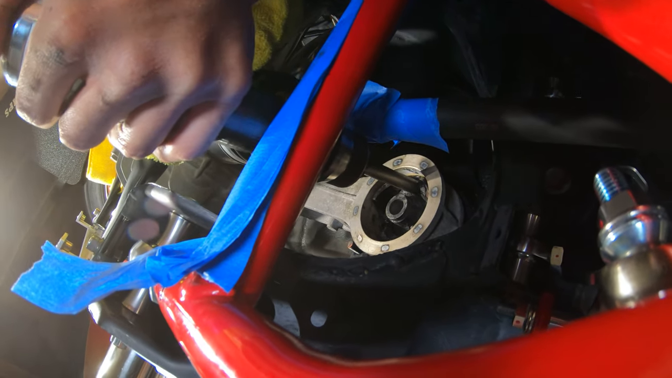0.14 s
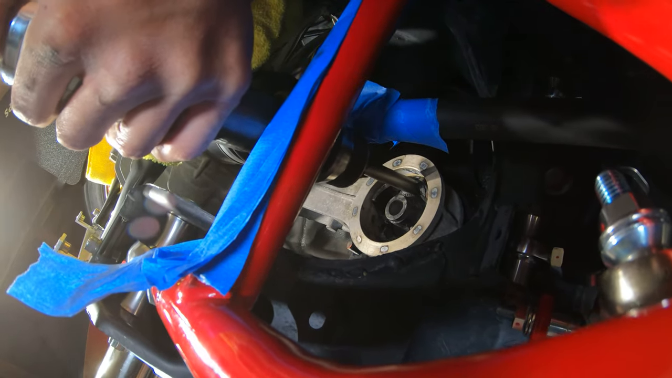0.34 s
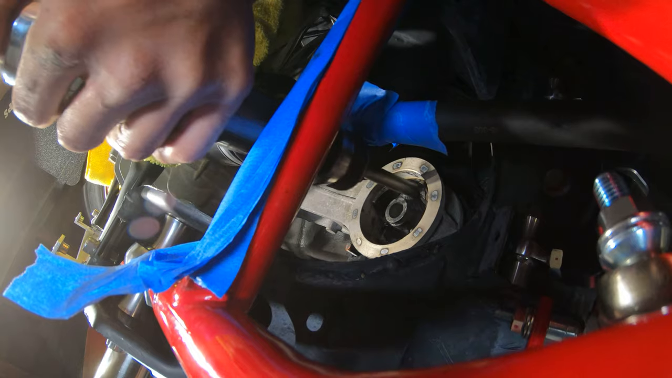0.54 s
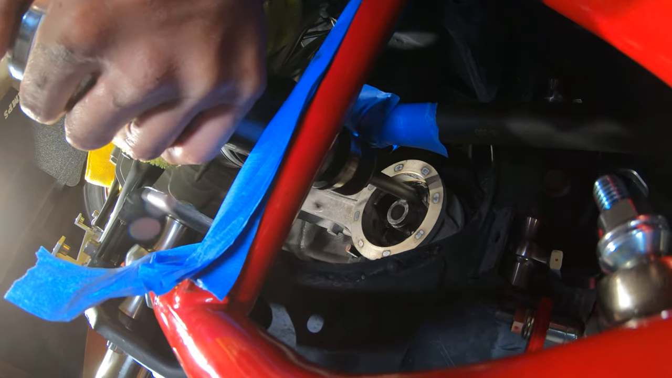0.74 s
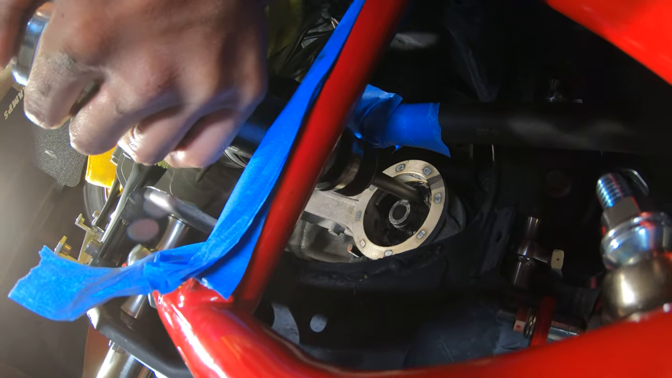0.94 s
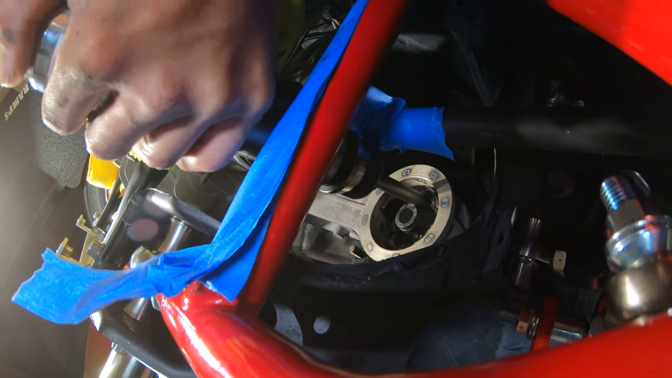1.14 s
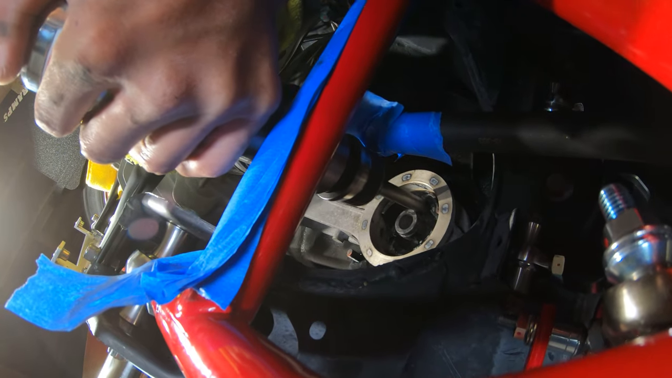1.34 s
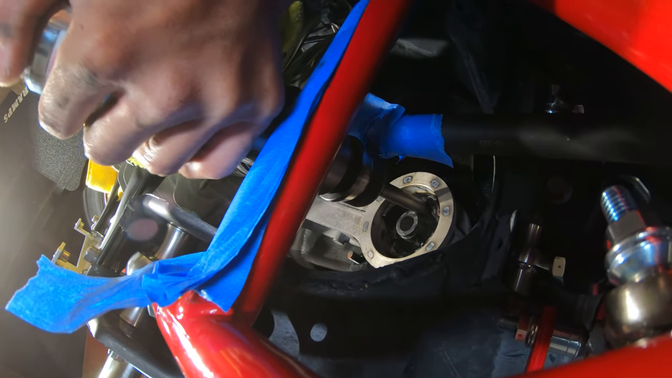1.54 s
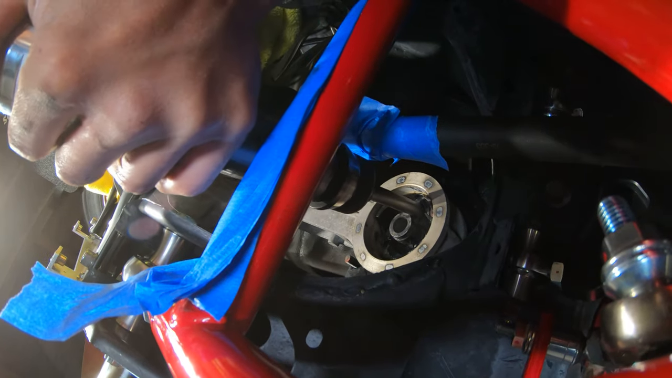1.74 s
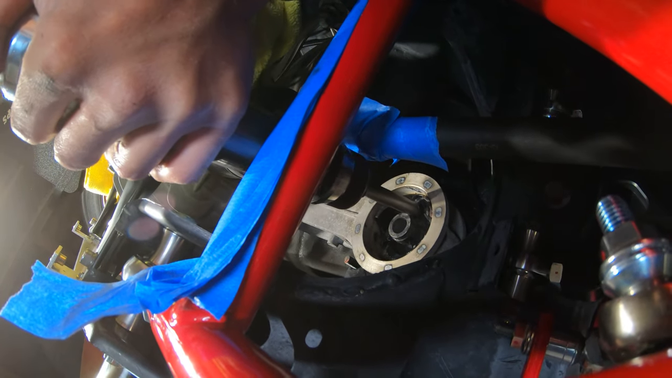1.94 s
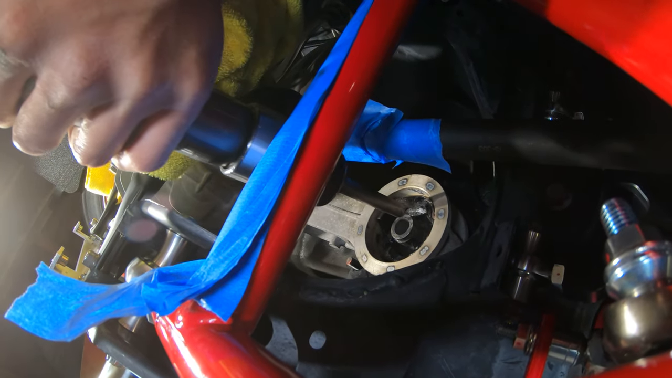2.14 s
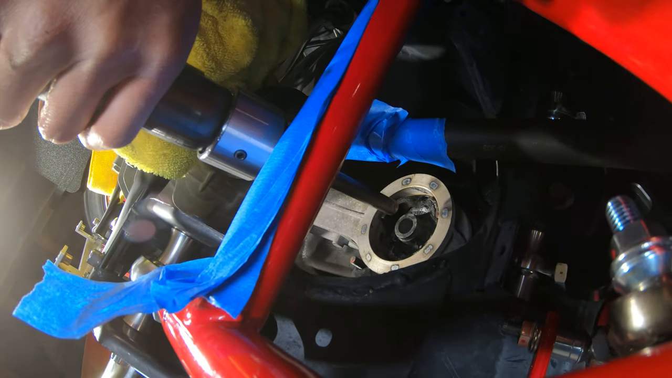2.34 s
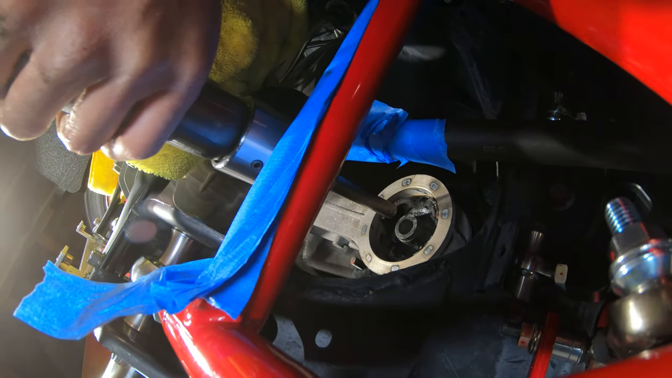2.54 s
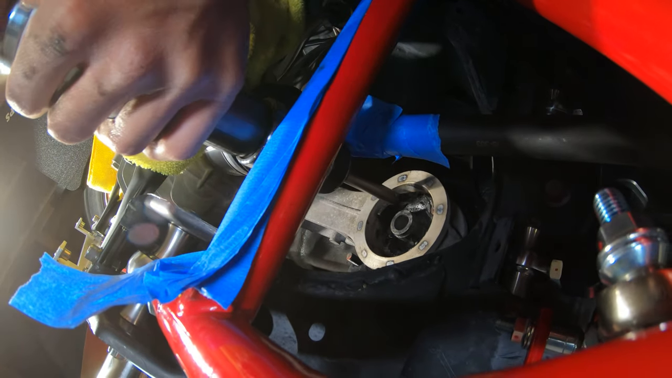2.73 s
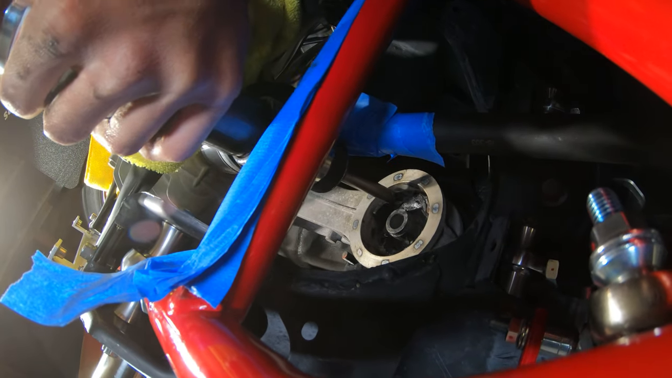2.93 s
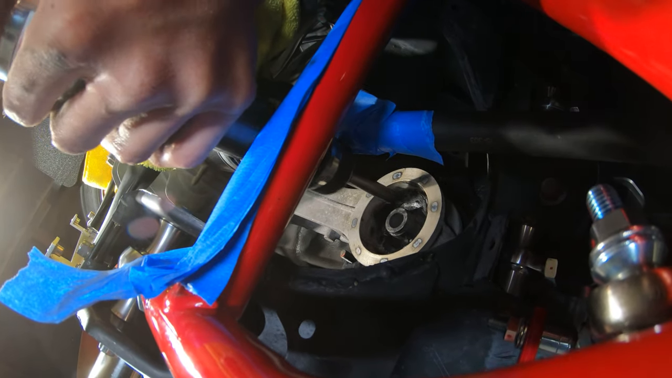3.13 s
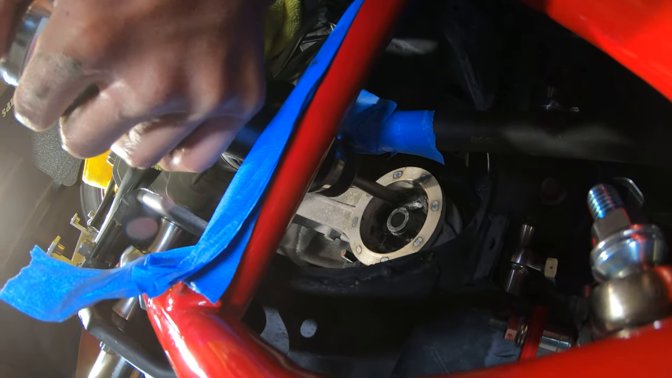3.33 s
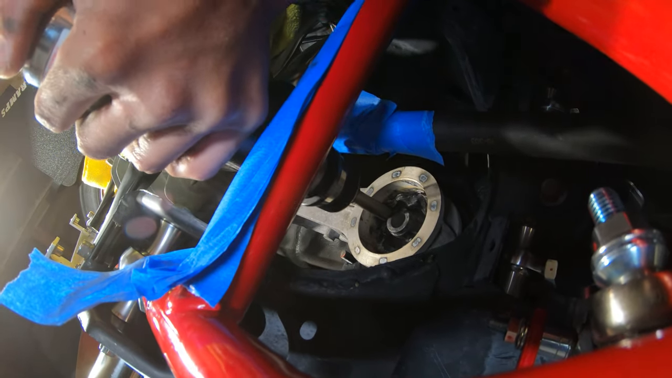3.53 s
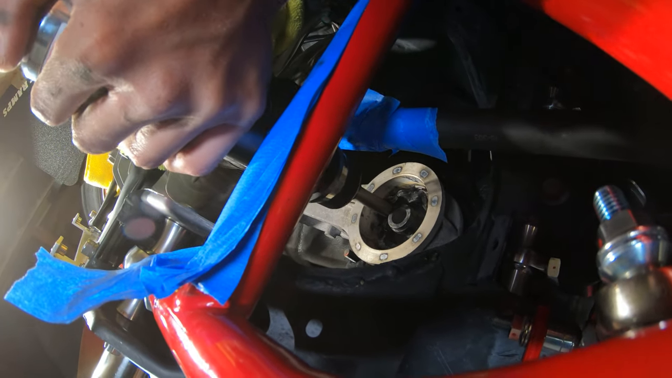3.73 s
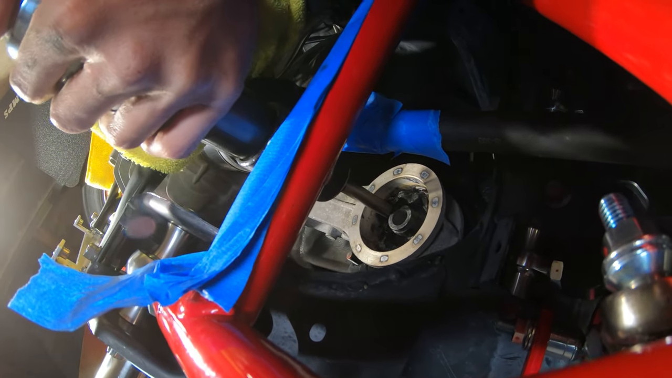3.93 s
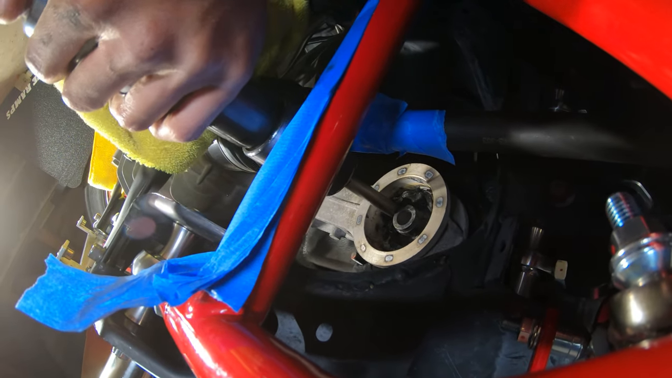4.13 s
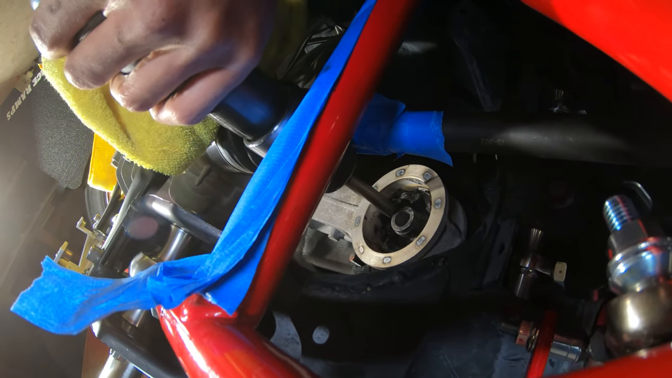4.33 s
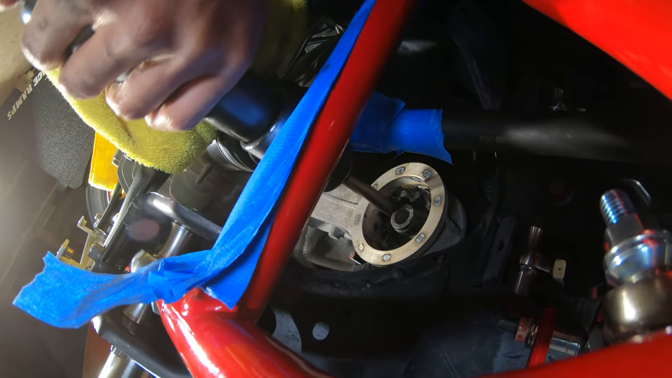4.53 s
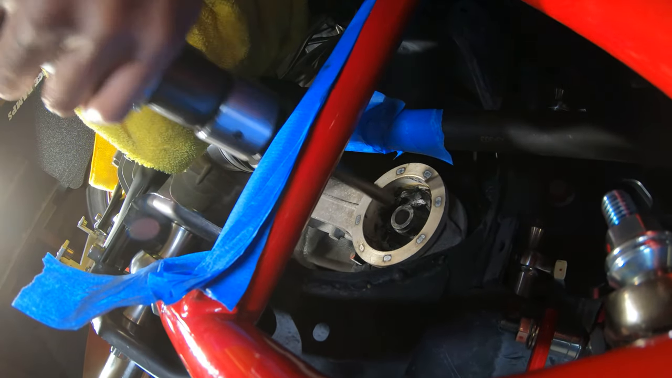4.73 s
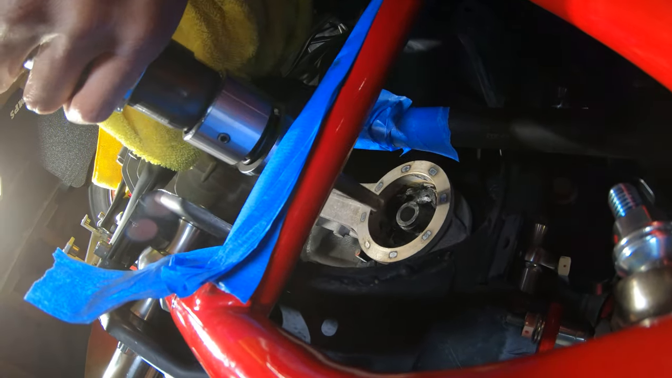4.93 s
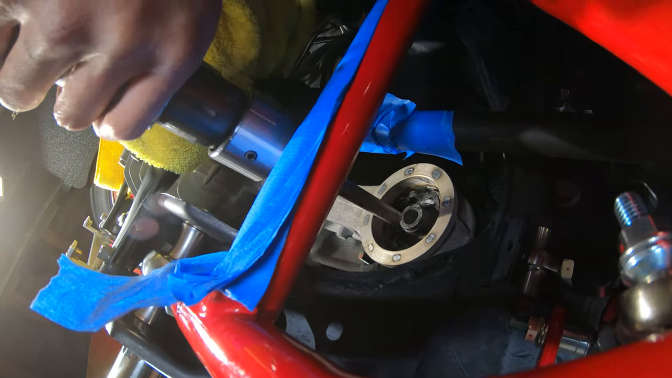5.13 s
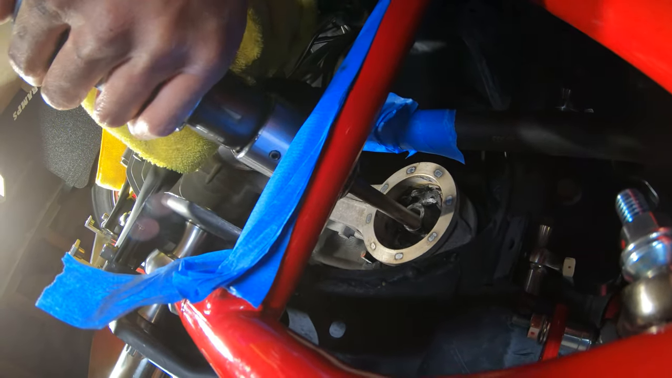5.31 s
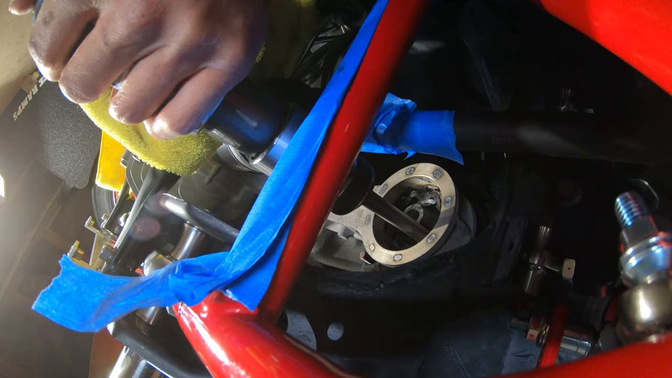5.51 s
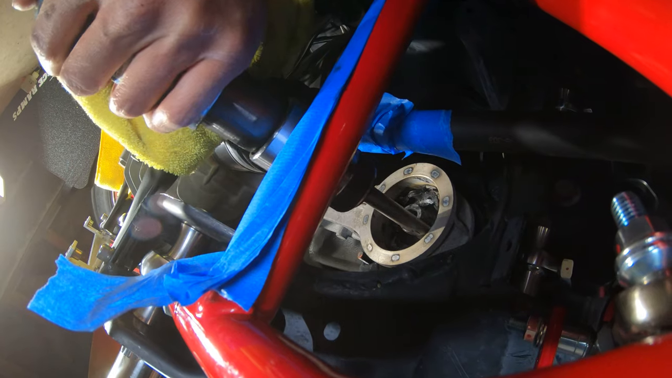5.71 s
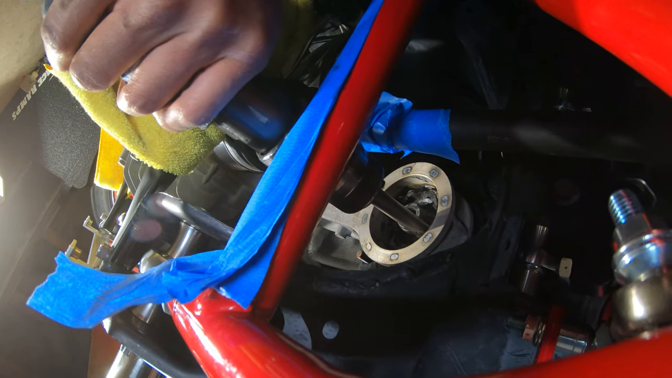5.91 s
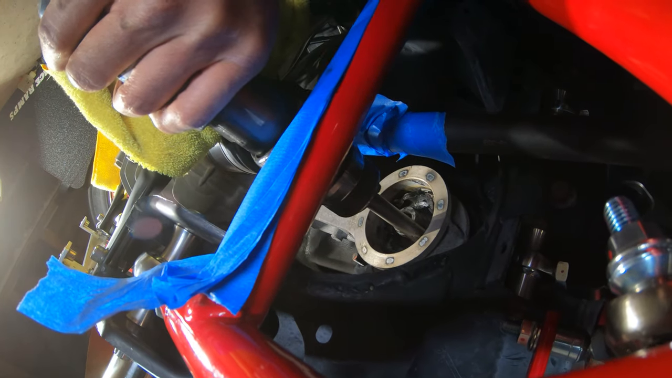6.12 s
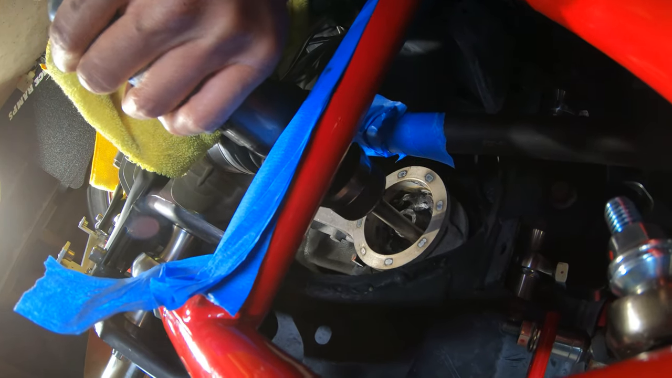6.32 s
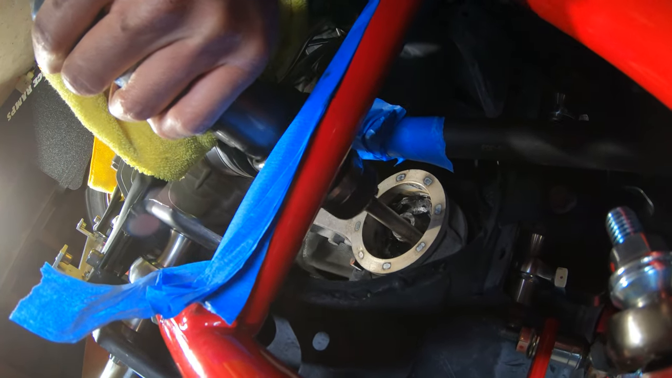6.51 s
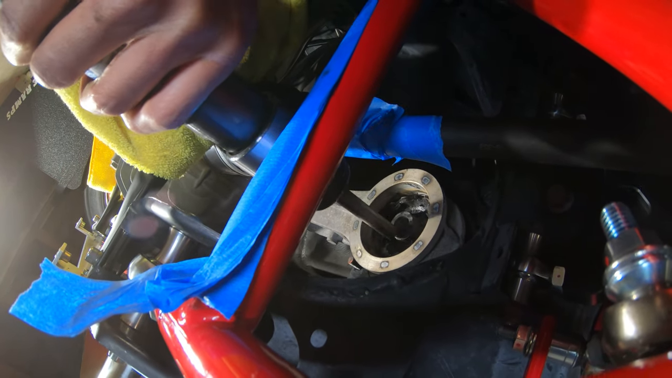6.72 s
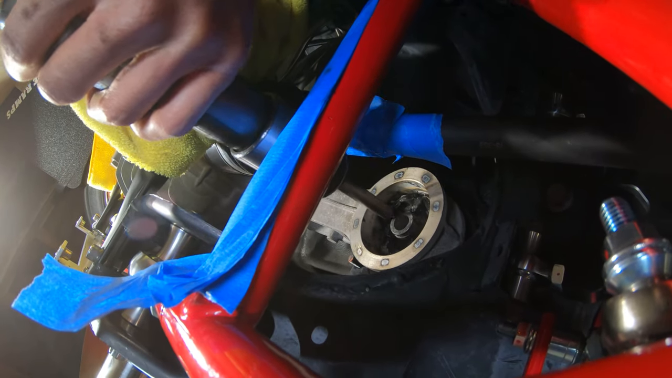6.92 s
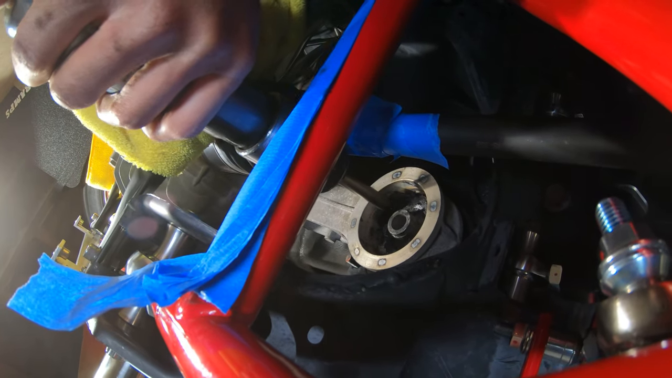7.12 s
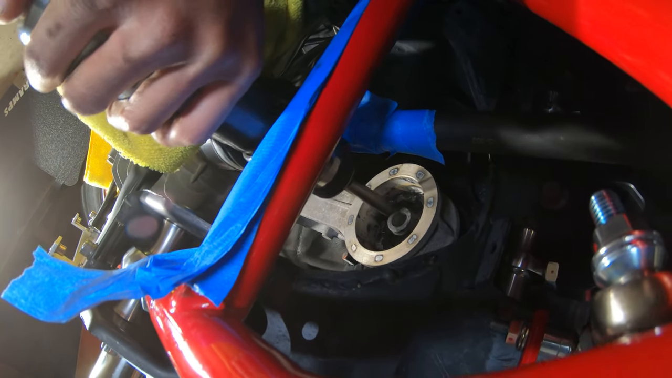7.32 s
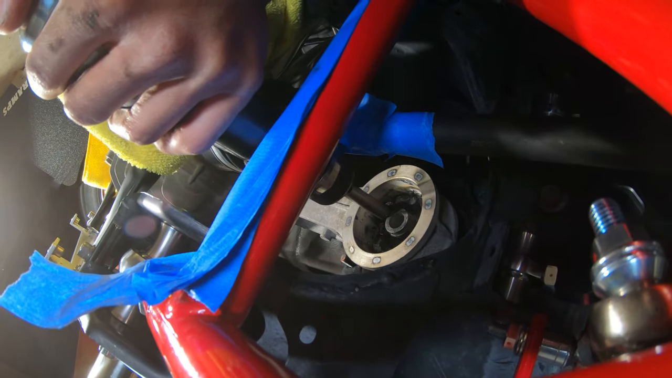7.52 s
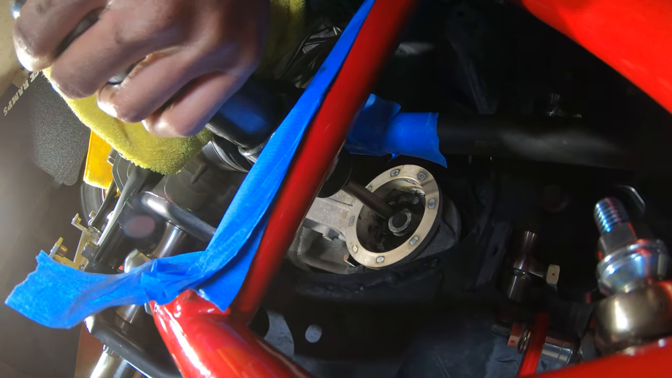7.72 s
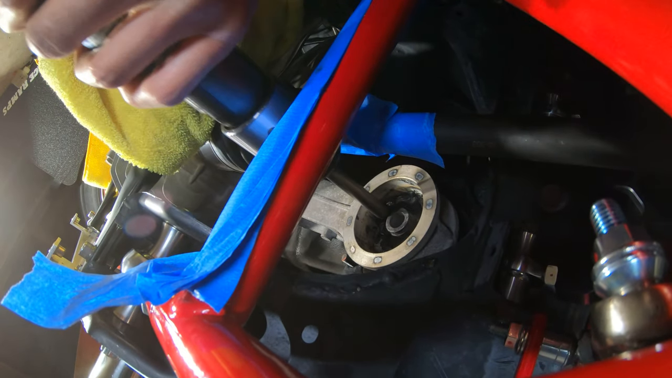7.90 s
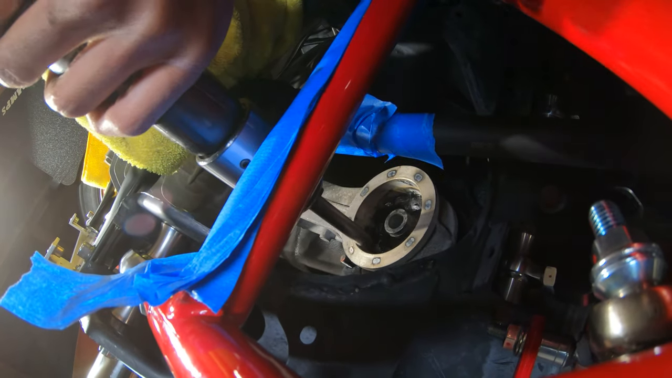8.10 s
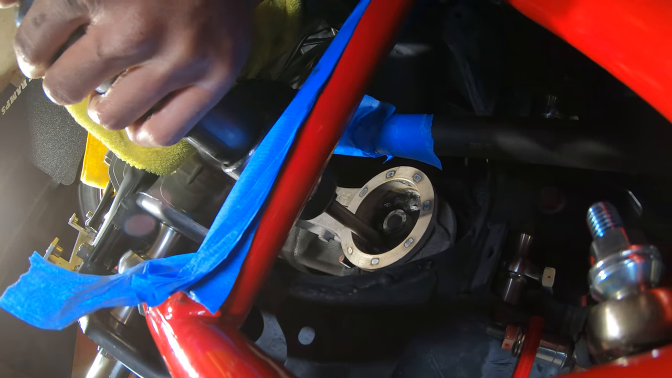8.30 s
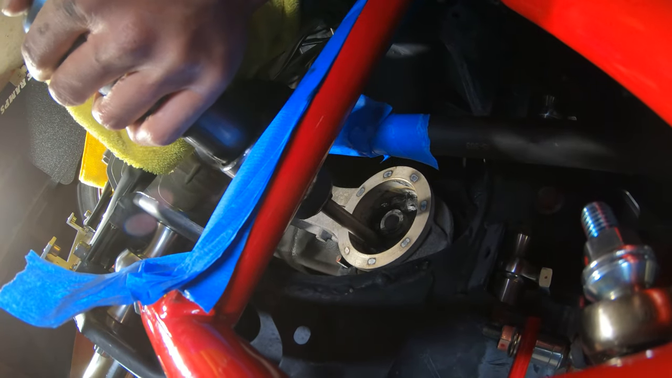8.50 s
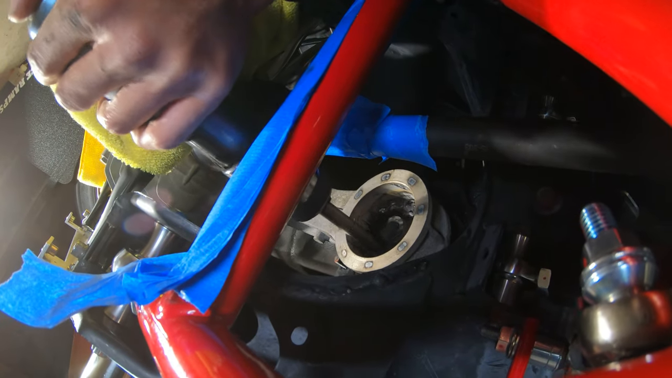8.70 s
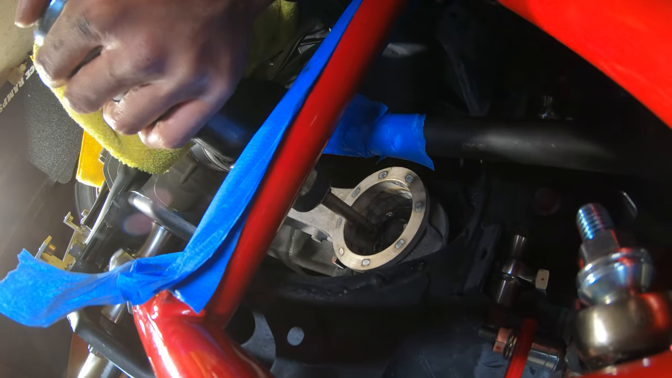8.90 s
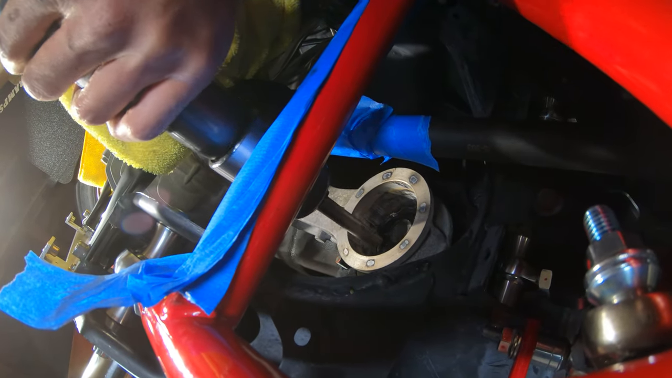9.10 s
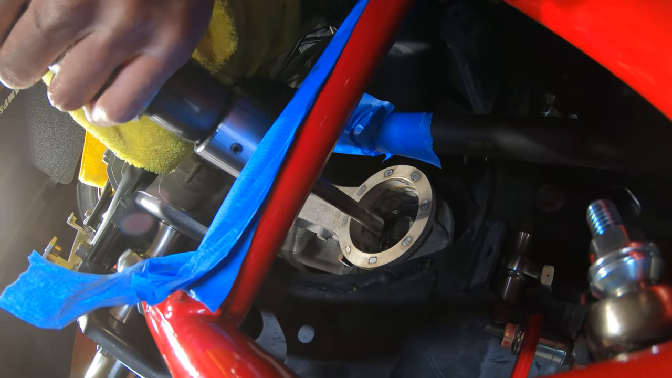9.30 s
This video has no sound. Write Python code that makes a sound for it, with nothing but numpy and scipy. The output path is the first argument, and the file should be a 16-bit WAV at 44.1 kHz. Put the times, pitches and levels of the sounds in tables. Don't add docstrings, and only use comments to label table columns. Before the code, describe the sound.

An air hammer rattles against a steel frame in short and long bursts in a garage, a compressor throbbing and hissing between them.

```python
import sys
import numpy as np
from scipy import signal
from scipy.fft import rfft, irfft, next_fast_len
from scipy.io import wavfile
from scipy.ndimage import uniform_filter1d

SR = 44100
rng = np.random.default_rng(int(sys.argv[2]) if len(sys.argv) > 2 else 0)


def magnitude_from_level(level_db):
    exponent = np.asarray(level_db, float) / 20
    return 10 ** exponent


def put_to_file(sound):
    columns = np.atleast_2d(sound).T
    safe = np.clip(columns, -1, 1)
    whole_steps = np.round(safe * 32767)
    wavfile.write(sys.argv[1], SR, whole_steps.astype(np.int16))


N = 412335
T = np.arange(N) / SR


def coloured(spectrum):
    size = next_fast_len(N)
    hz, db = np.transpose(sorted(spectrum))
    bin_hz = np.arange(size // 2 + 1) * SR / size
    shape_db = np.interp(np.log(bin_hz + 1), np.log(hz), db)
    x = irfft(rfft(rng.standard_normal(size)) * magnitude_from_level(shape_db), size)[:N]
    return x / x.std()


def train(start_s, size):
    x = np.zeros(N + 1)
    at = np.asarray(start_s) * SR
    i = at.astype(int)
    np.add.at(x, i, size * (1 - at + i))
    np.add.at(x, i + 1, size * (at - i))
    return x[:N]


def ring(x, hz, t60_s):
    pole = np.exp(2j * np.pi * hz / SR - np.log(1000) / (t60_s * SR))
    return signal.lfilter([1], [1, -pole], x).imag


def walk(rate_hz):
    k = int(SR / rate_hz)
    steps = np.repeat(rng.standard_normal(N // k + 1), k)
    x = uniform_filter1d(uniform_filter1d(steps, k), k)[:N]
    return x / x.std()


def soft(x, hz):
    return signal.sosfilt(signal.butter(4, hz, fs=SR, output="sos"), x)


HUSH_S = 0.13


def hush():
    s = blows()[0]
    last_s = s[np.clip(np.searchsorted(s, T) - 1, 0, None)]
    is_open = (T < s[0]) | (T - last_s > HUSH_S)
    return uniform_filter1d(1. * is_open, 600)


SHAFT_HZ, COMPRESSOR_DB = 28.41, -24
# shaft_multiple, level_db
STRONG_ORDERS = [(1, -14), (2, 0), (3, -16), (4, -13), (5, -23), (6, -16), (7, -17), (8, -23), (9, -18),
                 (10, -20), (11, -16), (17, -25), (19, -18), (20, -23), (22, -24), (25, -25), (26, -24),
                 (27, -22), (29, -23), (32, -20), (37, -27), (40, -28), (42, -24), (45, -29), (46, -27),
                 (48, -28)]
ORDERS_TOP, WEAK_DB, WEAK_DB_PER_ORDER = 50, -27, -0.1689
# pitch_hz, level_db
MOTOR_LINES = [(163.7, -16), (240, -22), (2299, -59), (2360, -58), (2417, -54), (2473, -57), (2503, -55),
               (2527, -53), (2558, -46), (2616, -55), (2912, -60), (2988, -61), (3268, -58)]
# hz, level_db_per_hz
MACHINE_NOISE = [(18, -32), (30, -3.5), (65, -14.5), (103, -17.5), (309, -19.5), (412, -26), (540, -19.5),
                 (680, -26), (1310, -21.5), (1850, -29), (2470, -24.5), (3000, -33), (3900, -69),
                 (6600, -120)]
MACHINE_NOISE_DB = -35.5
# hz, level_db_per_hz
LINE_HISS = [(1760, -31), (3000, -3), (3250, -2.5), (3960, -8.5), (4210, -5), (5340, -6), (6160, -10.5),
             (6730, -7.5), (9010, -17), (9910, -14), (11100, -28), (14200, -35), (15200, -46)]
LINE_HISS_DB = -41.5


def compressor():
    turn = 2 * np.pi * SHAFT_HZ * (T + 0.00003 * walk(3.69))
    waver = [magnitude_from_level(0.6 * walk(4)) for _ in range(6)]
    orders = {k: WEAK_DB + WEAK_DB_PER_ORDER * k for k in range(1, ORDERS_TOP + 1)}
    orders |= dict(STRONG_ORDERS)
    strokes, motor = np.zeros(N), np.zeros(N)
    for k, db in orders.items():
        phase = np.pi * (k / 2 + 1) if k < 5 else rng.uniform(0, 2 * np.pi)
        strokes += magnitude_from_level(db) * waver[k % 6] * np.sin(k * turn + phase)
    for hz, db in MOTOR_LINES:
        base_db = COMPRESSOR_DB if hz < 300 else 3
        motor += magnitude_from_level(db + base_db + 2.33 * walk(9)) * np.sin(hz / SHAFT_HZ * turn)
    lines = magnitude_from_level(COMPRESSOR_DB) * strokes + (0.25 + 0.71 * hush()) * motor
    throb = magnitude_from_level(MACHINE_NOISE_DB + 0.57 * np.sin(2 * turn)) * coloured(MACHINE_NOISE)
    leak = magnitude_from_level(LINE_HISS_DB + 0.45 * walk(4.6)) * coloured(LINE_HISS)
    return np.sqrt(2) * lines + throb + leak


# start_s, level_db
TUBE_RINGS = [
    (0, -40.5),
    (.93, -30.5),
    (6.655, -30),
]
TUBE_HZ, TUBE_T60_S = 1443, 4.2


def tube():
    out = np.zeros(N)
    hits_s = blows()[0]
    for s, db in TUBE_RINGS:
        stop_s = hits_s[hits_s > s][0] - 0.02
        out += (T >= s) * (T < stop_s) * magnitude_from_level(db - 60 * (T - s) / TUBE_T60_S)
    return uniform_filter1d(out, 1500) * np.sin(2 * np.pi * TUBE_HZ * T)


# recover_from_s, from_db
GAIN_RECOVERY = [(0, -4.5), (1.03, -14.5), (2.0, -16.5), (3.95, -15.5), (6.66, -15), (7.72, -16),
                 (9.1, -14)]
GAIN_TOP_DB, RECOVER_S, IN_BURST_DB = 4.5, 1.546, 4


def camera_gain():
    dive_s = np.r_[0, np.transpose(BURST_PULLS)[0]]
    which = np.searchsorted(dive_s, T, "right") - 1
    back_s, low_db = np.array(GAIN_RECOVERY)[which].T
    sinking_db = IN_BURST_DB * np.clip((back_s - T) / np.maximum(back_s - dive_s[which], 0.1), 0, 1)
    missing = np.exp(-np.clip(T - back_s, 0, None) / RECOVER_S)
    db = GAIN_TOP_DB - (GAIN_TOP_DB - low_db) * missing + sinking_db
    return magnitude_from_level(uniform_filter1d(db, size=SR // 50))


# start_s, peak_db, pitch_hz, t60_s
CHISEL_TICKS = [(4.0711, -41, 7260, 0.015), (4.6369, -38, 5100, 0.025), (4.919, -27, 7500, 0.06),
                (4.9517, -27, 4940, 0.016), (4.9636, -26, 4500, 0.018), (5.0, -31, 4700, .015),
                (4.979, -22, 4520, 0.009), (5.7208, -24, 4900, 0.021), (7.1142, -31, 3520, 0.025),
                (7.7523, -35, 4870, 0.028), (7.787, -36, 4760, 0.017), (8.057, -33.5, 5160, 0.02),
                (8.1014, -37, 4890, 0.025), (8.108, -27, 4700, 0.025), (8.18, -28, 5130, 0.01),
                (8.1864, -34, 4770, 0.025), (8.2242, -35, 5500, 0.019), (8.232, -33, 4830, 0.025),
                (8.2581, -37, 4530, 0.023), (8.648, -34, 6920, 0.015), (9.0525, -37, 4570, 0.025)]
# start_s, peak_db, pitch_hz, t60_s
DULL_KNOCKS = [(3.2157, -15.5, 544, 0.011), (3.2157, -17, 3260, 0.025), (3.2157, -25, 9100, .02),
               (4.918, -23.5, 1300, 0.17), (4.918, -22.5, 1750, 0.052), (4.919, -30, 560, 0.19),
               (4.925, -29, 960, 0.15), (4.922, -40, 8200, 0.1), (4.925, -27, 4600, 0.06),
               (5.502, -21, 2400, 0.11), (5.502, -27, 670, 0.11), (5.502, -29, 1500, 0.13),
               (5.503, -30, 3900, .1), (7.788, -45, 7650, 0.065), (8.1, -23, 380, 0.3),
               (8.109, -33, 560, 0.2), (8.11, -48, 7500, .1), (4.98, -38.5, 10900, 0.089),
               (4.98, -51, 13200, 0.1), (3.8, -39, 660, 0.57), (6.52, -32.5, 620, 0.63),
               (7.59, -29, 93, 0.62), (3.78, -29, 91, 0.37), (.85, -33, 111, 0.49),
               (8.876, -25, 11000, 0.046), (8.876, -38, 13200, 0.06), (8.944, -32, 11000, 0.033),
               (8.9, -26, 6400, .15), (7.52, -50, 10300, .05), (7.54, -18, 6400, 0.035)]


def ticks():
    out = np.zeros(N)
    crack = coloured([(800, -17), (4000, -9), (10000, 15), (15500, -30)])
    u = T[:SR // 6]
    for s, db, hz, t60_s in CHISEL_TICKS + DULL_KNOCKS:
        i = int(s * SR)
        grit = crack[i:i + len(u)] * np.exp(-u / 0.0042)
        attack = 1 - np.exp(-u / (0.012 * t60_s))
        scrape = rng.standard_normal(len(u)) * magnitude_from_level(-60 * u / t60_s) * attack
        bell_s = 0.15 * t60_s if hz > 7000 else min(t60_s, 6 / hz)
        sound = ring(ring(scrape, hz, bell_s), hz, bell_s)
        out[i:i + len(u)] += magnitude_from_level(db) * (sound / np.abs(sound).max() + 0.098 * (hz > 3000) * grit)
    return out


# start_s, length_s, level_db
VALVE_PUFFS = [(0.573, 0.0047, -27), (0.788, 0.02, -47), (1.103, .012, -47), (1.863, 0.016, -43.5),
               (3.197, .015, -40), (3.76, .02, -57), (6.273, 0.022, -31), (6.505, .02, -104),
               (7.34, 0.0073, -35), (7.564, .025, -59), (8.699, .013, -36), (8.894, 0.019, -41.5),
               (8.942, 0.01, -30.5)]


def valve():
    envelope = np.zeros(N)
    for s, length_s, db in VALVE_PUFFS:
        envelope += magnitude_from_level(db) * (T >= s) * np.exp(-np.clip(T - s - length_s, 0, 9) / 0.015)
    return envelope * coloured([(500, -18), (3000, -2), (5500, 6.5), (7500, -1), (11000, -7), (15500, -35)])


# hz, level_db_per_hz
EXHAUST_AIR = [(530, -36), (900, -12), (1300, -13.5), (1500, -8), (2050, -4), (2640, -10), (2940, -1.5),
               (3600, -10), (5160, -6.5), (7600, -13), (9900, -9.5), (11500, -23.5), (13500, -33),
               (15700, -55.5)]
# pitch_hz, level_db, t60_s
SHANK_RINGS = [(3580, -2.5, 0.021), (4300, -4, 0.045), (5320, -11, 0.12), (6280, -7, 0.13),
               (7030, -6.5, 0.096), (8800, -18, 0.08), (9280, -11, 0.11), (10230, -6.5, 0.074),
               (10900, -11, 0.07)]


def exhaust(s, air_db, rebound_db):
    u = T[:SR // 10]
    gush = (1 - np.exp(-u / 0.0009)) * (0.6 * np.exp(-u / 0.003) + np.exp(-(u / 0.016) ** 2))
    rebound = signal.fftconvolve(train(s + 0.005, magnitude_from_level(air_db + rebound_db)), np.exp(-u / 0.002))
    noise = coloured(EXHAUST_AIR) * magnitude_from_level(0.91 * walk(300))
    low = signal.sosfiltfilt(signal.butter(2, 3300, fs=SR, output="sos"), noise)
    hiss = (signal.fftconvolve(train(s, magnitude_from_level(air_db)), gush) + rebound)[:N] * (noise - low)
    rasp = signal.fftconvolve(train(s - 0.0004, magnitude_from_level(air_db)), np.exp(-u / 0.009))[:N] * low
    chance = rng.standard_normal((len(s), 2, len(SHANK_RINGS))).T
    shank = np.zeros(N)
    for (hz, db, t60_s), (late, loud) in zip(SHANK_RINGS, chance):
        shank += ring(train(s + 0.002 + 0.001 * late, magnitude_from_level(air_db + db + 4.5 * loud)), hz, t60_s)
    return magnitude_from_level(2) * hiss + magnitude_from_level(6) * rasp + magnitude_from_level(-4) * soft(shank, 11700)


# hz, level_db_per_hz
MOUNT_SHAKE = [(15, -23), (28, -1), (60, 1.5), (100, 0.5), (160, 2), (300, -11), (700, -18), (1500, -35.5)]


def mount(s, pop_db):
    envelope = signal.fftconvolve(train(s, magnitude_from_level(pop_db)), np.hanning(SR // 25))[:N]
    return envelope * coloured(MOUNT_SHAKE)


# pitch_hz, level_db, t60_s, lag_s
FRAME_RINGS = [(52, -19, 0.18, 0.0019), (102.7, -8, 0.23, -0.0033), (150.3, -14.5, 0.237, -0.0012),
               (194, -14, 0.17, 0.0012), (272, -8.5, 0.054, 0.0004), (476.3, -10, 0.047, 0.0005),
               (566.6, -22, 0.13, 0.0012), (840, -17.5, 0.032, 0.0006), (943, -22.5, 0.04, 0.0003),
               (1315, -10.5, 0.013, 0.0005),
               (84.7, -26, 0.67, 0.0045), (96.5, -18, 0.37, -0.0004), (613, -26.5, 0.26, -0.0048),
             (692, -37, 0.33, 0.038), (1210, -27, 0.012, 0.0077)]


def pop_and_frame(s, pop_db, low_db, tube_db):
    w = np.arange(-60, 61) / SR * np.pi * 780
    pop = signal.fftconvolve(train(s, magnitude_from_level(pop_db)), (2 * w ** 2 - 1) * np.exp(-w ** 2), "same")
    frame = np.zeros(N)
    for hz, db, t60_s, lag_s in FRAME_RINGS:
        seat_db = (hz < 230) * low_db + (120 < hz < 170) * tube_db
        chance_db = 1.05 * rng.standard_normal(len(s))
        frame += ring(train(s + lag_s, magnitude_from_level(pop_db + db + seat_db + chance_db)), hz, t60_s)
    return 1.234 * pop + soft(frame, 6100)


# pitch_hz, level_db, t60_s, lag_s
CHISEL_RINGS = [(1474, -11, 0.08, 0.), (1750, -11, 0.035, .0004), (2021, -2, 0.028, -.0003),
                (2198, -6.5, 0.028, -.0002), (2900, 3.5, 0.005, .0003), (2996, 3, 0.017, .0052)]
CRACK_DB, CRACK_S = 8, 0.0014


def chisel_steel(s, clang_db, two_db, three_db):
    jitter_s = 0.00003 * rng.standard_normal(len(s))
    rings = np.zeros(N)
    for hz, db, t60_s, lag_s in CHISEL_RINGS:
        chance = rng.standard_normal(len(s))
        seat_db = (1800 < hz < 2500) * two_db + (2500 < hz < 3500) * three_db
        size = magnitude_from_level(clang_db + db + seat_db + 1.5 * chance)
        rings += ring(train(s - 0.0004 + lag_s + jitter_s, size), hz, t60_s)
    hits = train(s - 0.0005, magnitude_from_level(clang_db + CRACK_DB + 1.8 * chance))
    snap = signal.fftconvolve(hits, np.exp(-T[:SR // 50] / CRACK_S))[:N]
    crack = snap * coloured([(600, -12), (1500, -0.5), (4500, -2), (9000, -10), (15000, -28)])
    return magnitude_from_level(4) * soft(rings, 5800) + crack


# start_s, first_gap_ms, steady_blows, first_period_ms, slowing_ms_per_blow
BURST_PULLS = [
    (.5845, 20.9, 9, 19.95, .11),
    (1.1098, 21.2, 34, 20.3, .08),
    (3.2185, 23.3, 25, 20.0, .062),
    (6.2879, 23.9, 9, 20.0, .057),
    (7.3537, 21.1, 9, 20.0, .15),
    (8.712, 22.2, 9, 20.2, 0),
]
SLOWEST_MS = 21.09
# at_s, late_ms
CHISEL_SLIPS = [(3.675, 1.3), (3.717, 1.6), (7.477, 2.1), (7.498, 3.1), (7.538, -2.6), (8.795, 1.3),
                (8.815, -2), (8.835, -1.1), (8.875, -2.1)]
SLIP_AIR_DB = 1.1
# from_s, pop_peak_db, clang_db, air_db
LEAN_FORCE = [(.5, -12, -28.5, -29), (1.0, -14.5, -28.5, -29.5), (1.305, -14, -26.5, -28.5),
              (3.1, -14, -28, -27), (3.558, -14.5, -30, -30), (3.685, -15, -29.5, -27.5),
              (6.2, -12, -27.5, -29.5), (7.3, -13.5, -29.5, -29), (7.49, -14, -31, -28),
              (8.6, -13.5, -30, -28.5)]
# extra_db, fade_blows
BURST_ONSET = [(4.5, 2.5), (3.5, 1.3), (3.5, 0.47)]
# start_s, pop_peak_db, clang_db, air_db
DYING_STROKES = [(0.7957, -17.5, -25, -32), (1.8497, -17.5, -28.5, -31.5), (3.7623, -22, -33, -31.5),
                 (6.4965, -16.5, -33.5, -33.5), (6.5246, -28, -52, -58), (7.5635, -24, -43, -34.5)]


def blows():
    s, k = [], []
    for first_s, gap_ms, count, period_ms, sag_ms in BURST_PULLS:
        steady_ms = np.minimum(period_ms + sag_ms * np.arange(count - 1), SLOWEST_MS)
        gaps_ms = np.r_[0, gap_ms, steady_ms]
        s = np.r_[s, first_s + np.cumsum(gaps_ms) / 1000]
        k = np.r_[k, np.arange(count + 1)]
    force = np.array(LEAN_FORCE)
    onset_db = np.transpose([extra_db * np.exp(-k / fade) for extra_db, fade in BURST_ONSET])
    db = force[np.searchsorted(force[:, 0], s) - 1, 1:] + onset_db
    for at_s, late_ms in CHISEL_SLIPS:
        i = np.argmin(np.abs(s - at_s))
        s[i] += late_ms / 1000
        db[i, 2] += SLIP_AIR_DB
    rows = np.r_[np.c_[s, db], DYING_STROKES]
    return rows[np.argsort(rows[:, 0])].T


# from_s, below_200hz_db, rings_2khz_db, rings_3khz_db, tube_150hz_db
CHISEL_SEAT = [(.5, -6., 2.5, 0.5, 1), (1.0, -2, 0.5, 0.5, -5), (3.1, -1, 3.5, -7, 3),
               (3.55, 0.5, 2.5, -5, -4), (6.2, -3, 1, -1, 0), (7.3, -3.5, 3, -3, 1), (8.6, -4., 0, -6, 1)]
SCATTER_DB = 0.77


def hammer():
    s, *force = blows()
    pop_db, clang_db, air_db = force + SCATTER_DB * rng.standard_normal((len(s), len(force))).T
    seat = np.array(CHISEL_SEAT)
    _, low_db, two_db, three_db, tube_db = seat[np.searchsorted(seat[:, 0], s) - 1].T
    out = pop_and_frame(s, pop_db, low_db, tube_db)
    out += chisel_steel(s, clang_db, two_db, three_db)
    out += exhaust(s, air_db, 3 * three_db - 8)
    return out + magnitude_from_level(-12.5) * mount(s, pop_db)


ROOM_T60_S, ROOM_DB = 0.14, -13.5
FAR_T60_S, FAR_DB = 0.82, -15


def garage_tail(near):
    u = T[:SR // 2]
    noise = coloured([(40, 0), (200, -4), (500, -3), (3000, -4.5), (9000, -5.5), (12000, -18), (16000, -40)])
    decay = magnitude_from_level(-60 * u / ROOM_T60_S) + magnitude_from_level(FAR_DB - 60 * u / FAR_T60_S)
    tail = noise[:len(u)] * decay * (u > 0.006)
    return magnitude_from_level(ROOM_DB) * signal.fftconvolve(near, tail / np.sqrt(np.sum(tail ** 2)))[:N]


def scene():
    steady = camera_gain() * (compressor() + tube())
    near = ticks() + valve() + hammer()
    return (steady + near + garage_tail(near))[None]


def roll_off(x):
    return signal.sosfilt(signal.butter(12, 15840, fs=SR, output="sos"), x)


MIC_TOP_HZ, TOP_HZ = 14500, 15600


def record(dry):
    x = signal.sosfilt(signal.butter(2, 22, "high", fs=SR, output="sos"), soft(dry, MIC_TOP_HZ))
    x = np.tanh(0.79 * x) / 0.81
    x = signal.sosfilt(signal.ellip(12, 0.2, 70, TOP_HZ, fs=SR, output="sos"), x)
    return roll_off(x)


dry = scene()
out = record(dry)
put_to_file(out)
```